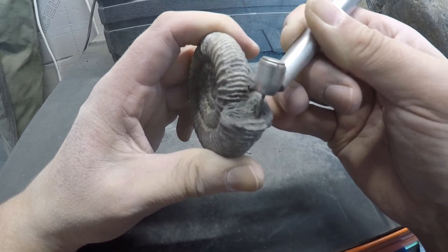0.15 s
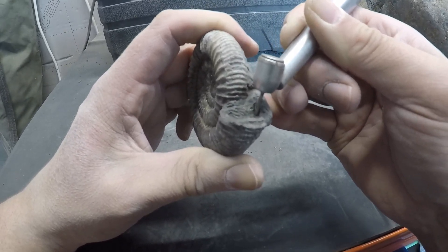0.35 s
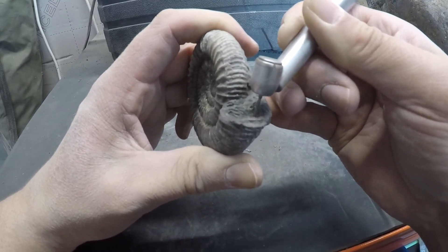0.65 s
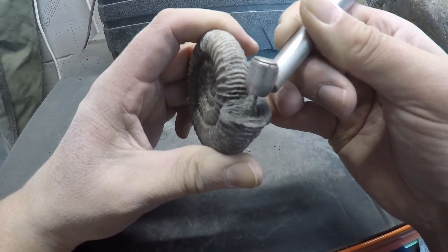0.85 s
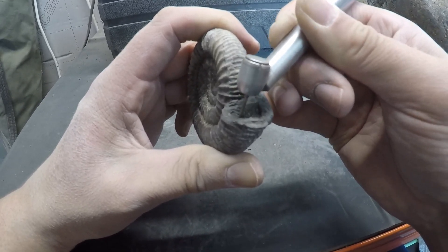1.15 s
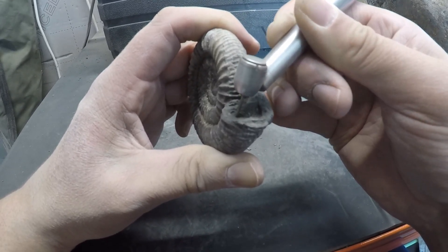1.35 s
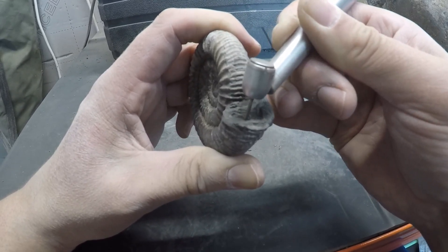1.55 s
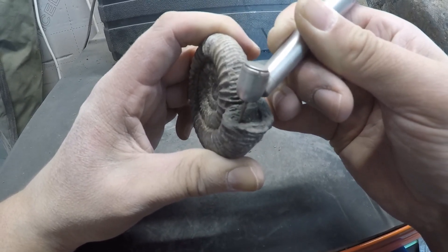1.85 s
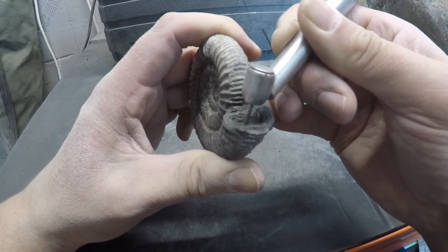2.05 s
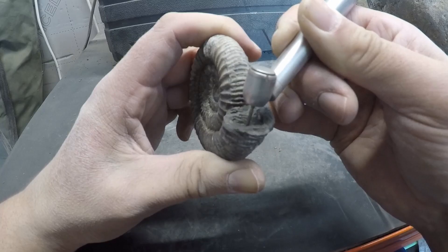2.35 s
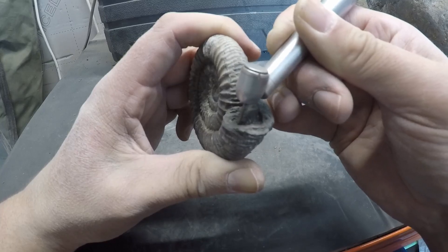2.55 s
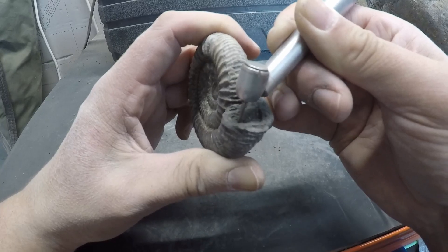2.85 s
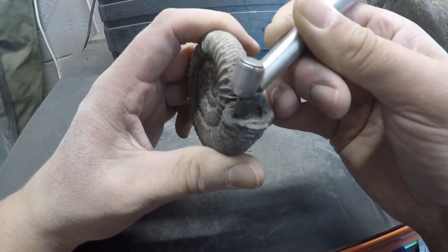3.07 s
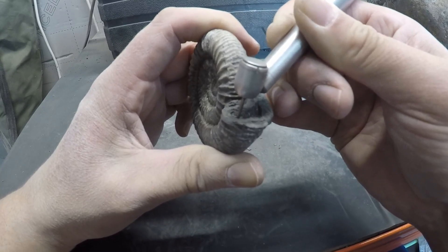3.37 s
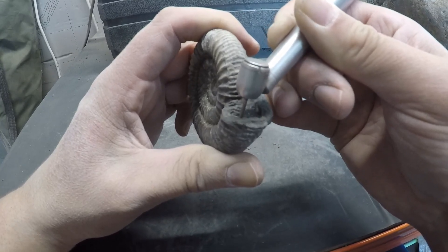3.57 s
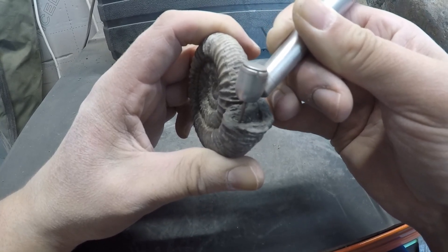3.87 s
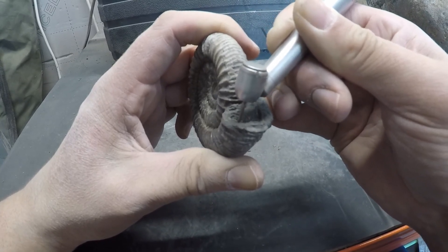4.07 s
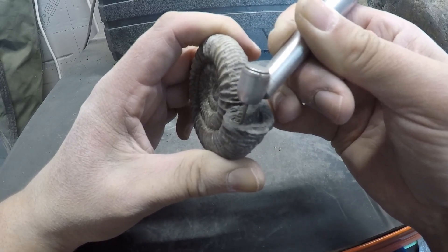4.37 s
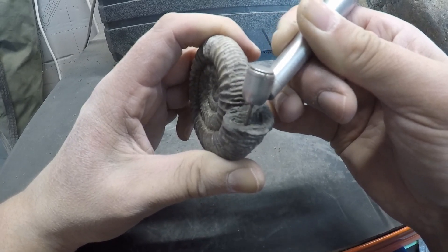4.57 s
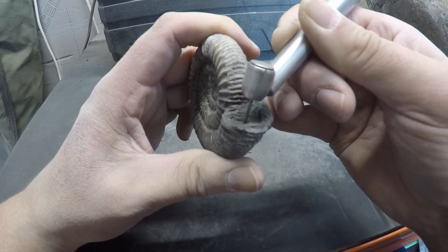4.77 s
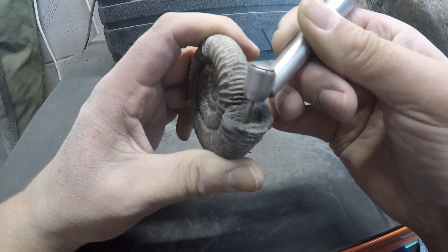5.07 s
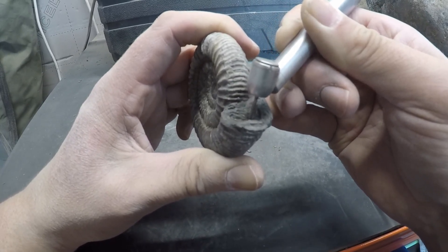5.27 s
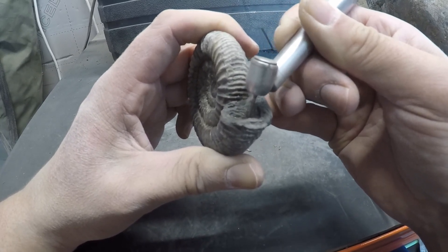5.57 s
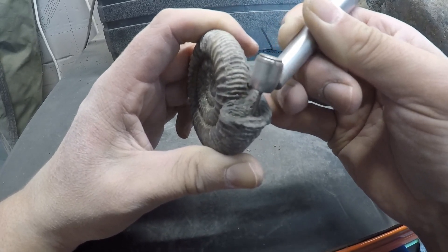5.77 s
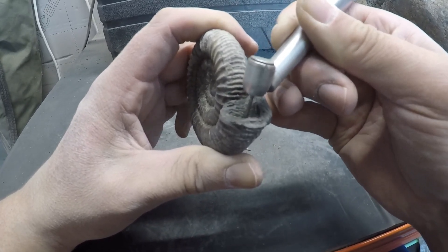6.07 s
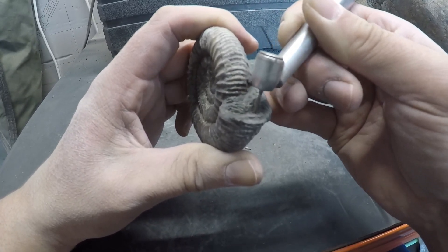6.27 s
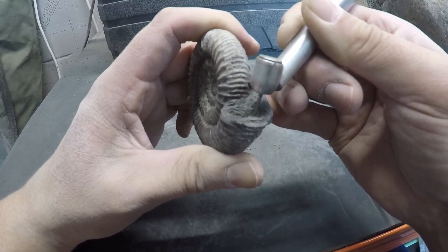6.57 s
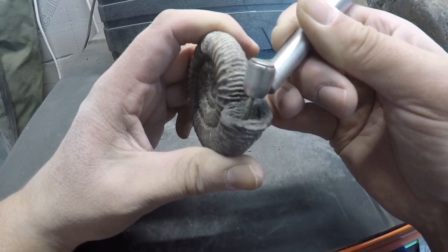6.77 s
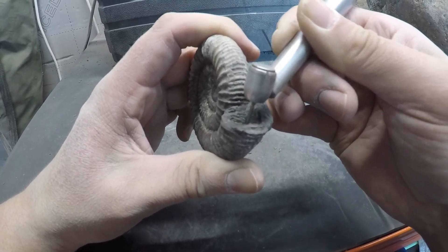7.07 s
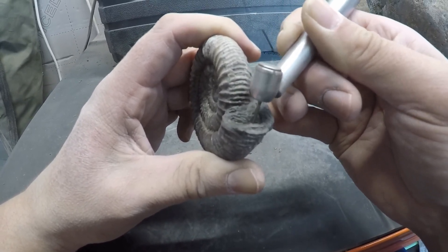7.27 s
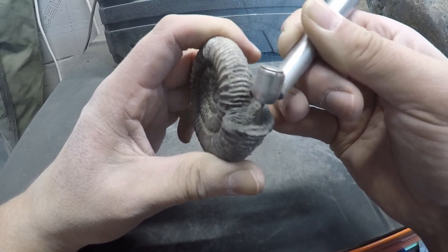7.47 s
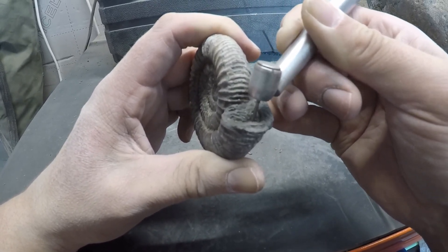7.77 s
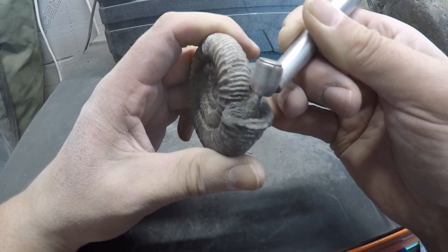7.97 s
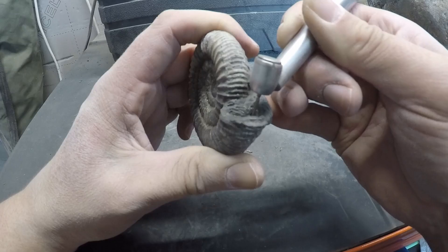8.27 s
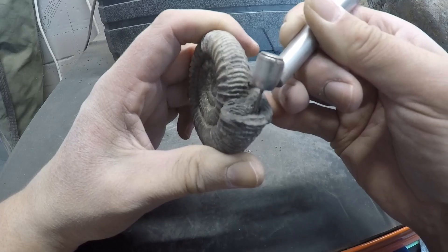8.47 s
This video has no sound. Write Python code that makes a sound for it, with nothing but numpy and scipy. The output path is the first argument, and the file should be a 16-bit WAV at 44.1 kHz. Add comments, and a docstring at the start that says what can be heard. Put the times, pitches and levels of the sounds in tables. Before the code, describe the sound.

A small air-turbine engraving tool whines high and shrill, sagging and recovering with short strokes, over gritty grinding on stone and rushing exhaust air.

```python
"""A high whine sags and recovers under short strokes, over grinding, rushing air and a faint low rush.
An air-turbine engraving handpiece works on a fossil: each stroke slows the rotor, whose turning rate sets
the whine, its overtones, the ring of the burr and the grinding level. The bearings rattle at half speed.
Noise-driven resonances make the grinding and escaping air; narrow noise bands make the brief squeaks."""
import sys
import numpy as np
from scipy import signal
from scipy.fft import rfft, irfft
from scipy.io import wavfile
from scipy.ndimage import uniform_filter1d

SR = 44100
rng = np.random.default_rng(int(sys.argv[2]) if len(sys.argv) > 2 else 0)


def int16_out(signal):
    """Quantize to a 16-bit WAV file."""
    q = np.round(np.clip(np.atleast_2d(signal).T, -1, 1) * 32767)
    wavfile.write(sys.argv[1], SR, q.astype(np.int16))


N = 380583

SIDES = np.array([[1], [-1]])  # left, right
# rotor rattles in its bearings: [t/s, half length/s, whine loss/dB, half-speed tone/dB]
RATTLE_EVENTS = [(0.16, .018, 0, -56), (.54, 0.057, 6, -37.5), (2.088, 0.0085, 4, -50),
                 (2.38, 0.026, 2, -53), (3.259, 0.017, 13, -29.5), (3.518, 0.015, 2, -50),
                 (3.821, .012, 8, -36), (3.911, 0.0082, 5.5, -34), (4.329, 0.029, 4.5, -36),
                 (4.565, 0.0085, 2, -44), (4.906, .02, -1, -38), (6.161, 0.011, 8, -46),
                 (6.824, 0.03, 0, -35), (6.962, 0.012, 21, -48), (7.325, .025, 4, -37),
                 (7.72, 0.019, -2, -48), (8.38, .012, 2, -36)]


def undb(db):
    """Decibels to gain."""
    return 10 ** (np.asarray(db) / 20)


def unit(x):
    """Scale to rms 1."""
    return x / np.sqrt(np.mean(x ** 2))


def bump(t_s, half_s, order=2):
    """A rounded swell around t_s, down to 1/e at half_s; higher orders have steeper sides."""
    away = np.abs((np.arange(N) / SR - t_s) / half_s)
    out = np.zeros(N)
    near = away < 4
    out[near] = np.exp(-away[near] ** order)
    return out


def swells(table, order=2):
    """Sum of the swells in rows of (t/s, half length/s, size, ..), one curve per size column."""
    return sum(np.outer(sizes, bump(t_s, half_s, order)) for t_s, half_s, *sizes in table)


def lookup(table, at):
    """Each further column of a table, interpolated at these values of its first column."""
    key, *columns = np.transpose(table)
    return [np.interp(at, key, column) for column in columns]


def walk(rate_hz):
    """Smoothed random curve of rms 1, from rate_hz draws a second."""
    hold = max(int(SR / rate_hz), 1)
    steps = np.repeat(rng.standard_normal(N // hold + 1), hold)
    return unit(uniform_filter1d(steps, hold)[:N])


def pan(left_minus_right_db):
    """Left and right gains of constant power."""
    gains = undb(SIDES * left_minus_right_db / 2)
    return gains / np.sqrt(np.mean(gains ** 2, axis=0))


def noise(likeness):
    """Left and right noise: the same at likeness 1, unrelated at 0, opposed at -1."""
    mid, side = rng.standard_normal((2, N))
    return np.sqrt((1 + likeness) / 2) * mid + np.sqrt((1 - likeness) / 2) * side * SIDES


def resonate(x, f_hz, width_hz):
    """A steep resonance (two-pole, twice), rms 1."""
    b, a = signal.iirpeak(f_hz, f_hz / width_hz, fs=SR)
    return unit(signal.lfilter(b, a, signal.lfilter(b, a, x)))


def ring(drive, modes, flicker_db, flicker_hz):
    """Turbulence of strength drive rings each mode, and each flickers on its own."""
    total = 0
    for f_hz, width_hz, db, side_db, likeness in modes:
        mode = resonate(noise(likeness) * drive, f_hz, width_hz)
        total = total + mode * undb(db + flicker_db * walk(flicker_hz)) * pan(side_db)
    return total


def smear(phase, width_hz, likeness):
    """A ragged line: low-passed noise, rms 1, carried on a moving phase."""
    low = signal.butter(2, width_hz / 2, fs=SR, output="sos")
    in_phase = signal.sosfilt(low, noise(likeness))
    quadrature = signal.sosfilt(low, noise(likeness))
    return unit(in_phase * np.cos(phase) + quadrature * np.sin(phase))


def turn(f_hz):
    """Phase of a moving frequency."""
    return 2 * np.pi * np.cumsum(f_hz) / SR


def workshop():
    """Faint low rush: shaped noise, nearly alike on both sides in the deep bass, which swells now and then."""
    # spectrum: [f/Hz, relative density/dB per Hz, likeness of sides -1..1]
    spectrum = [(20, -13, .95), (45, -18, .9), (75, -18.5, .7), (105, -20, .5), (137.6, -4, 0.27),
                (157.6, 2.5, .4), (230, -0.5, 0.4), (323, -5, 0.59), (606, -6, 0.085), (970, -5, 0.015),
                (1560, -7.5, 0.086), (2600, -18.5, 0.24)]
    # swells of the low part: [t/s, half length/s, gain/dB]
    rumble_swells = [(.43, 0.037, 6.5), (2.55, .12, 3.5), (3.25, 0.31, 3), (4.15, 0.33, 2), (5.78, .08, 6),
                     (8.07, 0.05, 7.5), (8.43, 0.075, 4)]
    rush_db, rumble_db, split_hz = -45, -53, 380
    f_hz, *columns = np.transpose(spectrum)
    bins_hz = np.arange(N // 2 + 1) * SR / N
    db, likeness = (np.interp(np.log(bins_hz + 1), np.log(f_hz), column) for column in columns)
    shares = np.sqrt(1 + SIDES * likeness)  # mid, side
    mid, side = irfft(rfft(rng.standard_normal((2, N))) * undb(db) * shares, N)
    rush = unit(np.array([mid + side, mid - side])) * undb(rush_db)
    # the low part gets a level of its own
    low = signal.sosfiltfilt(signal.butter(3, split_hz, fs=SR, output="sos"), rush)
    return rush - low + unit(low) * undb(rumble_db + swells(rumble_swells)[0])


def exhaust(air_db):
    """Spent air rings the handle's passages, with a hollow between the two main resonances."""
    # air passages: [f/Hz, width per pass/Hz, relative level/dB, left minus right/dB, likeness of sides -1..1]
    passages = [(1234, 310, -21, 5, -0.27), (1686, 360, -17, 6, 0.48), (1964, 250, -15, 22, 0.046),
                (2362, 476, -3.5, 2, -0.12), (3205, 1170, -2, -0.5, 1), (3794, 460, -5, -1, 1),
                (4540, 1730, -5.5, 0.5, 1)]
    turbulence = undb(0.6 * walk(200))
    rush = ring(turbulence, passages, flicker_db=1.53, flicker_hz=24.95)
    b, a = signal.iirpeak(2740, 9, fs=SR)
    hollowed = rush - 0.5 * signal.lfilter(b, a, rush)
    return hollowed * undb(air_db - 1.27)


def grinding(grind_db):
    """Grit breaks off in dense uneven grains and rings the head."""
    # metal head: [f/Hz, width per pass/Hz, relative level/dB, left minus right/dB, likeness of sides -1..1]
    head_modes = [(5735, 780, -6.5, 0.5, 0.13), (6253, 510, -2, 9.5, 0.55), (6876, 710, -3.5, 9, 0.14),
                  (7470, 420, -5, -5, 0.52), (7935, 380, -5.5, -3.5, 0.39), (8730, 1500, -9, 1, -0.2),
                  (9675, 1100, -4, -8, 0.11)]
    # fine hiss of the cutting: same columns
    hiss_modes = [(10730, 620, -13.5, -9, -0.043), (11900, 1200, -14.5, 2, -0.15),
                  (12540, 600, -18.5, -3, .1), (13550, 1400, -13, -1, .45), (14800, 700, -23, -1, .3),
                  (14350, 570, -28.5, 0, .3)]
    grit = undb(walk(2500))
    head = ring(grit, head_modes, flicker_db=0.5, flicker_hz=58.05)
    hiss = ring(grit, hiss_modes, flicker_db=1.5, flicker_hz=48.1)
    return (head + hiss) * undb(grind_db + 1)


def squeaks():
    """The burr sticks and slips on the rock: brief narrow bands of noise."""
    # catches: [t/s, half length/s, f/Hz, peak level/dB]
    catches = [(1.05, 0.0065, 7800, -21), (1.167, 0.0086, 7230, -17.5), (1.215, 0.009, 7400, -31),
               (1.343, 0.0097, 7200, -17.5), (1.46, 0.039, 7630, -23), (1.63, .009, 7060, -21.5),
               (1.801, 0.013, 2270, -29)]
    total = 0
    for t_s, half_s, f_hz, db in catches:
        line = smear(turn(np.full(N, f_hz)), width_hz=225, likeness=0.54)
        total = total + line * bump(t_s, half_s, order=4) * undb(db)
    return total * pan(-1)


def burr(speed_hz):
    """The shank rings in a moving band, purer near free speed, where a second band moves against it."""
    # shrill ring: [speed/Hz, centre/Hz, level before trim/dB]
    ring_by_speed = [(4410, 9650, -31.5), (4640, 9750, -25.5), (5020, 10050, -25.5), (5185, 10300, -24),
                     (5374, 10200, -25), (5770, 10380, -24), (5830, 10800, -27), (5880, 11130, -29),
                     (6120, 11450, -31.5)]
    centre_hz, db = lookup(ring_by_speed, speed_hz)
    free = np.clip((speed_hz - 5750) / 150, 0, 1)
    phase = turn(centre_hz + 20 * walk(40))
    core = smear(phase, width_hz=210, likeness=0.1)
    skirt = (1 - free / 2) * smear(phase, width_hz=900, likeness=0.2) / 2
    upper = free * undb(-41) * smear(turn(24100 - centre_hz), width_hz=200, likeness=0.4)
    return (core + skirt) * undb(db - 5) * pan(-8.5) + upper * pan(-4)


def rotor_speed():
    """Each stroke loads the rotor, unevenly over the ridges; it slows and recovers with a little inertia."""
    # strokes on the rock: [start/s, length/s, drag at full pressure/Hz]
    stroke_rows = [(-.199, 0.38, 1483), (0.084, 0.37, 889), (0.324, .326, 323), (.52, .667, 1069),
                   (1.155, .065, 290), (1.27, .197, 760), (1.45, 0.16, 1377), (1.642, 0.26, 329),
                   (1.759, 1.05, 139), (1.933, 0.11, 810), (2.242, .165, 310), (2.983, 0.63, 320),
                   (3.863, 0.22, 162), (4.152, 0.25, 99), (4.559, 0.16, 722), (4.933, 0.35, 1294),
                   (5.446, .384, 1018), (6.078, 0.16, 882), (6.468, .15, 610), (6.809, 0.15, 628),
                   (7.128, 0.18, 466), (7.442, 0.15, 658), (7.852, 0.24, 1634), (8.372, 0.16, 807)]
    free_hz, inertia_s = 6166, 0.033  # speed with the burr in the air; time constant of the lag
    rise_share, lift_s = 0.797, 0.191  # share of a stroke to full pressure; time constant of easing off
    ridges = 0.008  # rms share by which the load varies
    t = np.arange(-SR, N) / SR  # a second of lead-in
    load_hz = np.zeros(len(t))
    for start_s, length_s, drag_hz in stroke_rows:
        press = np.clip((t - start_s) / (length_s * rise_share), 0, 1)
        lift = np.exp(-np.maximum(t - start_s - length_s, 0) / lift_s)
        load_hz += drag_hz * press * lift
    keep = np.exp(-1 / (inertia_s * SR))
    lagged_hz = signal.lfilter([1 - keep], [1, -keep], load_hz)[-N:]
    return free_hz - lagged_hz * (1 + ridges * walk(18))


def bearing_rattle(phase):
    """Play in the bearings lets the rotor rattle at half speed."""
    level = sum(undb(tone_db) * bump(t_s, half_s, order=4) for t_s, half_s, _, tone_db in RATTLE_EVENTS)
    return level * smear(phase / 2, width_hz=74, likeness=0.59)


def overtones(phase, braking, drag):
    """Partials and a line at 1.5 times speed as the rock brakes the rotor; a third partial at low speed."""
    # burr bites: [t/s, half length/s, peak level before trim/dB]
    bite_rows = [(0.18, 0.07, -26), (0.288, 0.055, -25), (0.428, 0.034, -21.5), (1.211, 0.083, -31),
                 (1.546, 0.019, -24.5), (1.999, .035, -26), (4.62, 0.026, -39), (5.246, 0.067, -32),
                 (5.73, 0.06, -36), (6.209, 0.026, -33), (8.029, 0.061, -30)]
    bite = np.maximum(braking, 0) * undb(-36)
    bite = bite + sum(undb(peak_db) * bump(t_s, half_s) for t_s, half_s, peak_db in bite_rows)
    partials = np.sqrt(2) * (np.sin(2 * phase) + undb(-13) * np.sin(3 * phase))
    partials = partials * undb(3 * walk(120) - 2)
    chatter = undb(-4.5) * smear(1.5 * phase, width_hz=380, likeness=0.64)
    third = drag * np.sin(3 * phase) * undb(-44 + 3.7 * walk(40))
    return (bite * (partials + chatter) + third) * pan(-7)


def whine(phase, speed_hz, shake, gain_db, shift_db):
    """Once-a-turn tone with a ragged edge; the handpiece radiates it differently at each speed."""
    # radiation: [speed/Hz, level before trim/dB, left minus right/dB]
    radiation = [(4430, -34.5, 0), (4750, -30, 1.5), (5130, -30, 7), (5198, -23.5, 9), (5350, -19, 4.5),
                 (5510, -22.5, 13.5), (5784, -23.5, 14), (5953, -18, 7), (6124, -16, 11)]
    # rubbing stifles the whine: [t/s, half length/s, loss/dB]
    stifle_rows = [(.06, .015, 5), (.165, 0.018, 0), (.55, .04, 1), (1.22, .045, 7), (1.35, .02, 10),
                   (1.66, .03, 6), (2.85, .035, 0.5), (4.72, 0.015, 7), (5.15, .014, 8), (5.34, 0.013, 0),
                   (5.57, .02, -2.5), (5.78, .055, 3), (6.075, .013, 8), (6.24, .025, 6), (6.63, 0.021, 2),
                   (7.18, .02, 5), (7.35, .012, 1), (7.42, 0.014, 2), (7.63, 0.019, 0), (7.74, 0.03, 2)]
    db, side_db = lookup(radiation, speed_hz)
    loss_db = sum(loss * bump(t_s, half_s, order=6) for t_s, half_s, loss, _ in RATTLE_EVENTS)
    loss_db = loss_db + swells(stifle_rows, order=6)[0]
    flutter_db = shake * (1.06 * walk(170) + 0.22 * walk(55) + 0.41 * walk(22))
    tone = np.sqrt(2) * np.sin(phase + np.array([[0.5], [0]])) * undb(flutter_db)  # left leads by 0.5 rad
    edge = 0.25 * smear(phase, width_hz=480, likeness=0.92)
    return (tone + edge) * undb(db + gain_db - loss_db - 0.5) * pan(side_db + shift_db + 1.8 * walk(26))


def rotor(speed_hz, braking, gain_db, shift_db):
    """One unsteady rotor phase drives the whine, the overtones and the half-speed rattle."""
    drag = np.clip((5600 - speed_hz) / 700, 0, 1)
    # play in the bearings shakes the tone, more so while the burr drags on the rock
    shake = 1 + 0.4 * drag
    phase = turn(speed_hz + 7 * walk(70)) + 0.16 * shake * walk(450)
    return (bearing_rattle(phase) + overtones(phase, braking, drag)
            + whine(phase, speed_hz, shake, gain_db, shift_db))


def scene():
    """The strokes set the speed, and the speed plays the tool; as the whine swells, grinding and air ease."""
    # drift as the hands shift: [t/s, whine gain/dB, grinding gain/dB, air level before trim/dB]
    drift = [(0, 1.5, 0, -31), (.9, -1.1, 1.5, -31.5), (1.65, 1.5, -1.5, -32), (1.85, -6, 0, -29.5),
             (2.55, -2.3, 1, -30.5), (3.4, 1, -0.2, -32.5), (4.6, -2, -0.5, -31.5), (6, -0.5, 0, -32),
             (7.3, 0, -0.5, -31.5), (8.6, 1, -0.3, -32.5)]
    # rotor settles and its whine swells: [t/s, half length/s, whine gain/dB, shift to the left/dB]
    songs = [(.244, .051, 8, -1), (.445, 0.036, 7.5, 1), (.831, 0.14, 3, -2), (1.13, .035, 2.5, -5),
             (1.985, .017, 2.5, -5), (2.35, 0.037, 5.5, -7), (2.71, 0.047, 5.3, -1), (3.16, .06, 1.5, 0),
             (3.45, .07, 4.5, -1), (3.56, 0.077, 2.5, -8), (3.99, 0.078, 4, 3), (4.25, 0.036, -0.5, -7),
             (4.46, 0.065, 4.5, 7), (4.651, 0.049, 7.5, -8), (4.992, 0.033, 9, -8), (5.239, 0.047, 4.5, 0),
             (5.645, 0.039, 5.5, 4), (5.92, 0.041, 1.5, 1), (6.139, .033, 5.5, -10), (6.557, 0.041, 6, -8),
             (6.898, 0.028, 6, -10), (7.237, .028, 5.5, -11), (7.484, .039, 6.5, -7), (7.875, .029, 5, -4),
             (7.965, 0.019, 3, 7), (8.05, 0.045, 8, 0), (8.26, .03, -0.5, 0), (8.492, 0.081, 3, 2)]
    # brief surges: [t/s, half length/s, air gain/dB, grinding gain/dB]
    surges = [(1.3, .02, 0, 0.5), (1.55, 0.067, -1.5, -0.7), (1.8, .025, -0.5, 1.5), (2.6, 0.027, 1.5, 0),
              (3.25, 0.039, 3.5, -0.5), (3.78, 0.045, 3.5, 2), (4.1, 0.025, -1, 1), (4.35, .04, 2, 1),
              (5.2, 0.09, 1, 1.5), (5.75, 0.045, -0.5, 1), (6.09, 0.024, 1, 0.5), (8.08, 0.046, 1.5, 0)]
    # pressing harder slows the rotor: [speed/Hz, grinding level before trim/dB, air gain/dB]
    grind_by_speed = [(4350, -21.5, -0.5), (5130, -24, 0.13), (5300, -24.5, -1), (5815, -24, 1),
                      (6025, -27, -0.5)]
    hard_braking_hz_per_s = 5500
    speed_hz = rotor_speed()
    # 1: braked hard, -1: recovering fast
    braking = np.clip(-np.gradient(speed_hz) * SR / hard_braking_hz_per_s, -1, 1)
    whine_db, grind_db, air_db = lookup(drift, np.arange(N) / SR)
    song_db, shift_db = swells(songs, order=4)
    air_surge_db, grind_surge_db = swells(surges)
    load_db, flow_db = lookup(grind_by_speed, speed_hz)
    # song factors: dB lost per dB that the whine gains
    grind_db = grind_db + load_db + 0.9 * braking + grind_surge_db - 0.36 * song_db
    air_db = air_db + flow_db - 0.37 * braking + air_surge_db - 0.27 * song_db
    return (workshop() + exhaust(air_db) + grinding(grind_db) + squeaks() + burr(speed_hz)
            + rotor(speed_hz, braking, whine_db + song_db, shift_db))


def record(dry):
    """A steep elliptic low-pass cuts the top."""
    top_hz = 15350
    return signal.sosfilt(signal.ellip(14, 0.2, 80, top_hz, fs=SR, output="sos"), dry)


dry = scene()
out = record(dry)
int16_out(out)
```